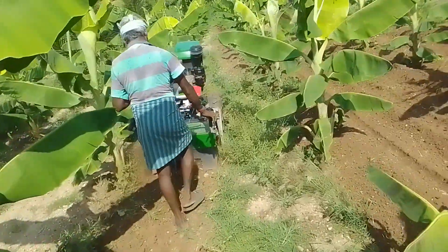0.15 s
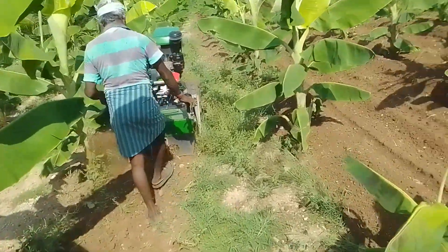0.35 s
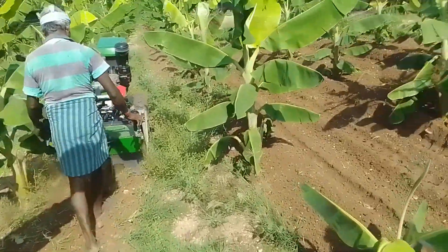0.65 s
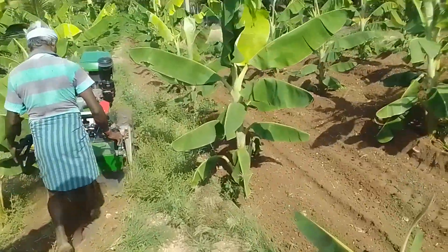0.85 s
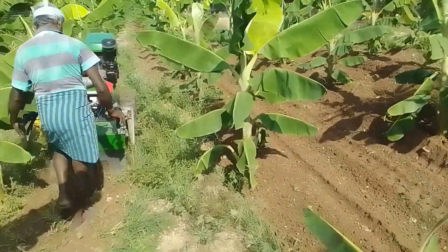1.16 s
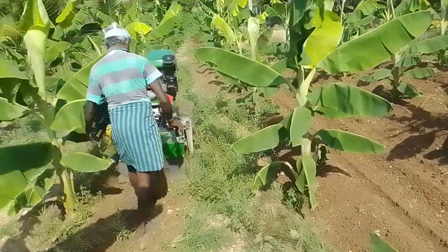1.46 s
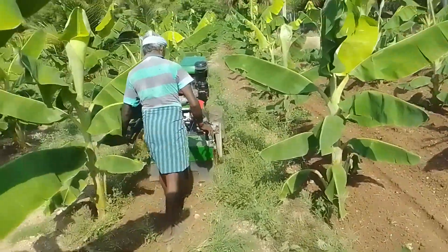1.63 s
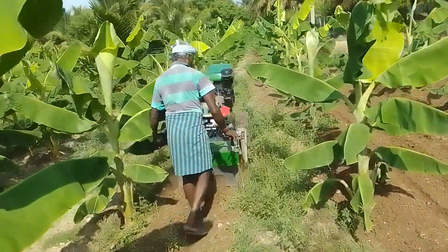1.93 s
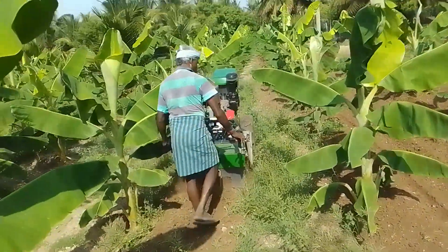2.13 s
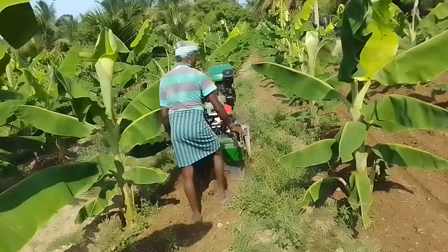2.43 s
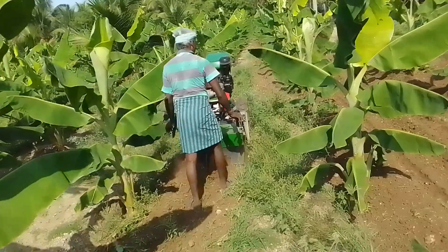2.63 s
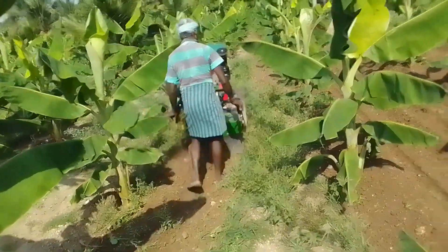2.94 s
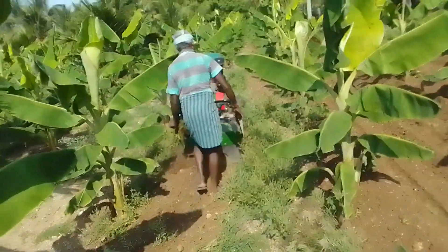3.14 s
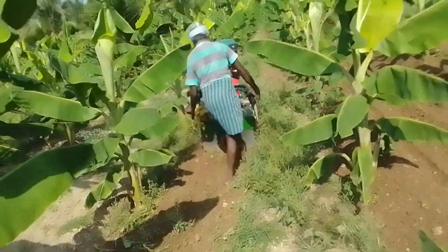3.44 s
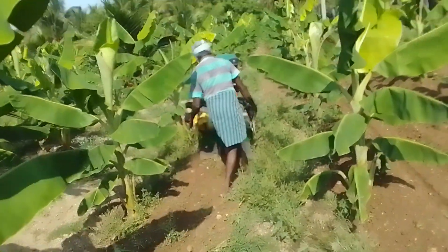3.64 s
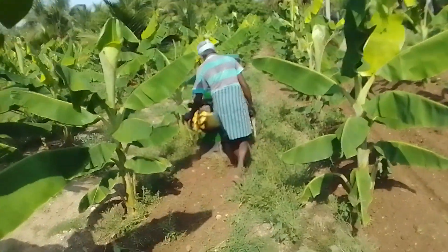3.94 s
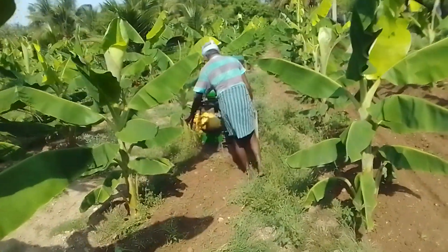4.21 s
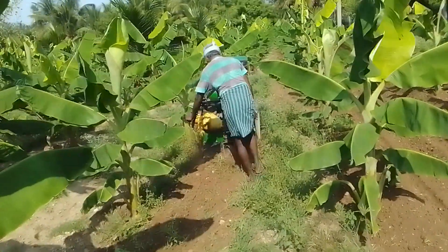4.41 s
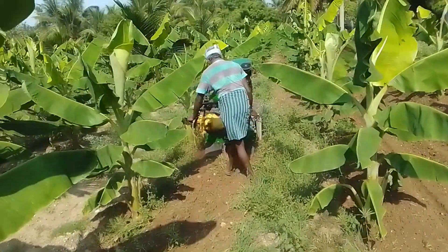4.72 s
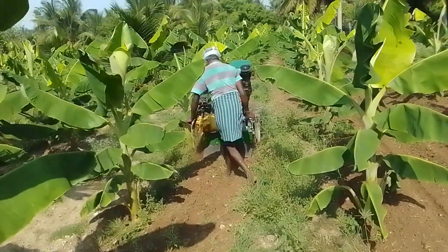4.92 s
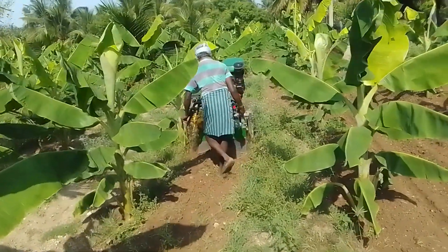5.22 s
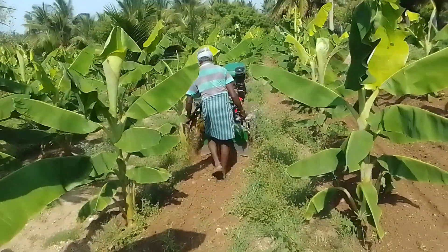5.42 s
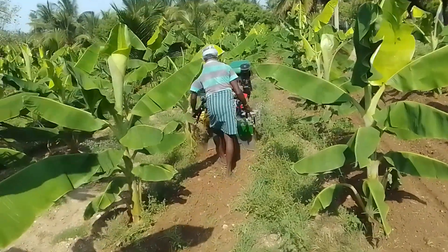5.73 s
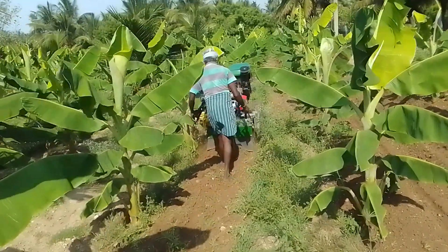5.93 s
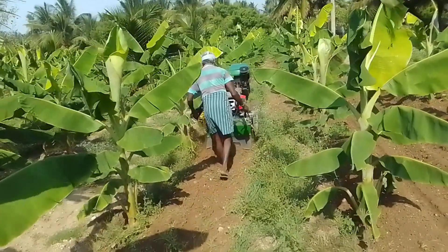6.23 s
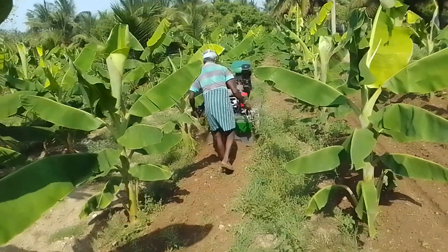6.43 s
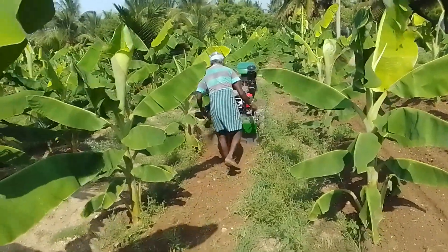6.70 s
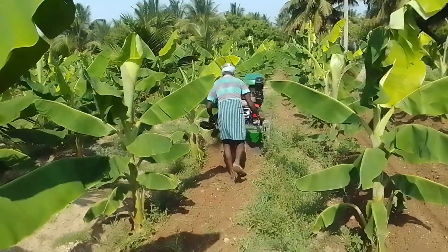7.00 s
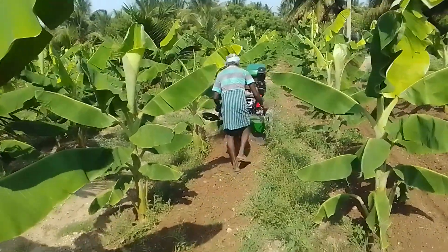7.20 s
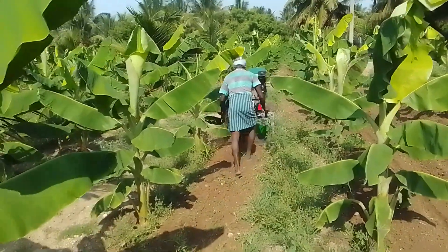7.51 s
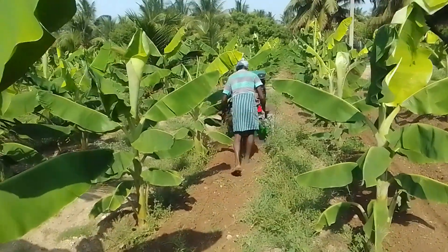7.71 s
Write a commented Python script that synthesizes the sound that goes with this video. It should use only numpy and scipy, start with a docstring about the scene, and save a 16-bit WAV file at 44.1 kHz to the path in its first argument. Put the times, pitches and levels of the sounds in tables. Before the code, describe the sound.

A single-cylinder diesel tiller works soil outdoors, about four metres from the microphone at first. From 0 to 2.5 s it chugs evenly at nearly sixteen firings a second: hard midrange knocks with ringing block tone, low exhaust thumps, dense metallic clatter and a fine pulsing sizzle. A thin wavering squeal near 1900 Hz swells around 1.5 s and flicks again at 1.9 s, with a bright stone tick at 1.8 s. Between 2.5 and 3.4 s the machine is screened; the hiss closes down and the chug turns dull, hollow and boxy, knocking steadily until 5.8 s. Then the throttle opens: strong hollow exhaust barks take over, knock softens until 7 s, and speed climbs to almost nineteen beats a second. Knock hardens again around 7.3 s. The machine gradually recedes, still running at the end, over barely audible open air.

```python
"""A single-cylinder diesel power tiller works a furrow and moves off between banana plants.
Each cycle, combustion knock rings block modes, the exhaust thumps and noise impacts clatter and sizzle.
Around 3 s man and leaves screen the machine and it turns dull; near 6 s the throttle opens further, the
engine speeds up and the tailpipe barks; the knock sinks until 7 s, then hardens again.
A pulley squeals (wavering sine), stones tick on the tines (noise bursts), faint open air lies behind."""
import sys
import numpy as np
from scipy import signal
from scipy.fft import rfft, irfft, next_fast_len
from scipy.io import wavfile
from scipy.ndimage import uniform_filter1d, map_coordinates

SR = 44100
rng = np.random.default_rng(int(sys.argv[2]) if len(sys.argv) > 2 else 0)


def dump_mix(stems):
    """Bounce the given channels to the path in sys.argv[1] as a 16-bit WAV at rate SR."""
    frames = np.atleast_2d(stems).T  # one column per channel
    limited = np.clip(frames, -1, 1)  # hard clip at full scale
    pcm = np.round(limited * 32767).astype(np.int16)
    wavfile.write(sys.argv[1], SR, pcm)


N = 346626
TIME_S = np.arange(N) / SR

# engine speed: (time [s], firings [1/s])
SPEED = [(0, 15.753), (.5, 15.749), (1, 15.973), (1.8, 16.002), (2.7, 15.981), (3.1, 15.724), (3.5, 15.764),
         (4, 15.886), (4.6, 15.98), (5.3, 15.938), (5.9, 15.888), (6.2, 16.472), (6.6, 17.16), (7, 17.877),
         (7.4, 18.415), (7.86, 18.76)]
# throttle, two pushes: (time [s], opening [0-1])
THROTTLE = [(5.8, 0.29), (5.97, 0.61), (6.3, 0.87), (6.72, 1), (6.9, 0.75), (7.25, 1), (7.62, 0.98),
            (7.86, 1)]
# combustion hardness, drives crack and block ring: (time [s], level [dB])
HARDNESS = [(0, -1.5), (1.6, 1), (2.75, 0), (2.95, -8), (3.25, -4), (3.5, -2.5), (4, 1), (4.6, 2.5),
            (5.2, 0), (5.9, -1), (6.35, -6), (7, -9), (7.35, 8), (7.86, 3)]
# the man steps in front of the engine, then leaves close behind him: (time [s], screening [0-1])
SCREEN = [(2.5, 0.21), (2.76, 0.42), (2.84, 0.66), (3.15, 0.76), (3.36, 1)]
# listener follows a few steps, then the tiller draws away: (time [s], distance [m])
DISTANCE = [(0, 4.17), (1.2, 4.12), (7.86, 8.44)]
# short combustion crack: (frequency [Hz], level [dB], decay [s], lag [s])
CRACK = [(815, 0, 0.0028, 0.0003), (690, -10, 0.0025, 0.0003)]
# lighter slaps of piston and valves: (position [cycles], level re crack [dB])
SLAPS = [(-.23, -10.5), (-.145, -11), (0.073, -12)]
# engine block modes: (frequency [Hz], level [dB], t60 [s])
BLOCK = [(625, -12.5, 0.053), (672, -8, 0.046), (749, -3.5, 0.31), (780, -10, 0.092), (865, -7.5, 0.2),
         (1025, -13, 0.11), (1104, -14.5, 0.12), (1250, -17.5, 0.056), (1357, -20.5, 0.16)]
# frame and guard modes: (frequency [Hz], level [dB], t60 [s])
FRAME = [(236, -24, 0.12), (287.8, -2, 0.18), (308, -24, 0.063), (366.4, -2.5, 0.15), (397.4, -2, 0.21),
         (434, -15.5, 0.13)]
# silencer boom at one exhaust pulse: (frequency [Hz], level [dB], decay [s], lag [s])
BARK = [(205, -5, 0.012, -0.0078), (255, 1.5, 0.0041, -.0012), (390, -21, 0.005, -.0005),
        (578, -4, 0.0051, 0)]
# tailpipe ring, level before colouring: (time [s], pitch [Hz], peak at nearest point [dB])
PIPE = [(0, 790, -20), (2.1, 820, -27), (2.9, 750, -26), (3.8, 691.5, -18), (4.6, 689.4, -20.5),
        (5.5, 720, -16), (5.86, 779, -22), (5.94, 805, -9), (6.17, 796, -11), (6.27, 593, -12.5),
        (6.65, 617, -9.5), (6.95, 740, -11), (7.15, 736, -9.5), (7.35, 732, -11.5), (7.6, 690, -7),
        (7.86, 693, -10.5)]
# clatter spectra, open and screened: (frequency [Hz], density [dB/Hz])
CLATTER_OPEN = [(60, -58), (160, -35), (240, -8.5), (400, 3), (560, -23.5), (780, -1.5), (1100, 1),
                (1350, -4.5), (1900, 6), (2300, -1.5), (2800, 0.5), (3300, -5), (3900, -8.5), (4600, -14.5),
                (6000, -68)]
CLATTER_SCREENED = [(60, -36), (160, -17), (240, 6.5), (400, 7.5), (510, 2.5), (620, 12), (850, 9.5),
                    (1020, 2.5), (1400, 1.5), (1900, -7), (2400, -2.5), (2900, -3.5), (3500, -16.5),
                    (3950, -43), (5000, -69)]
# clatter brightens as the engine swings into view, hollows out behind the man:
# (time [s], half length [s], centre [Hz], half width [octaves], level [dB])
VIEWS = [(1.15, 0.42, 2480, 0.24, 3.5), (2.0, 0.37, 3870, 0.25, 3.5), (3.08, 0.25, 1053, 0.43, -4)]
# thin singing covers: (frequency [Hz], width [Hz], level [dB])
COVERS = [(1112, 14, -12.5), (1434, 31, -11), (1704, 24, -13), (1912, 7.7, -14.5), (2061, 53, -16.5),
          (2283, 17, -10.5), (2430, 16, -16), (2838, 13, -12), (3670, 17, -21.5)]
# sizzle and grit spectra: (frequency [Hz], density [dB/Hz])
SIZZLE_SPECTRUM = [(3000, -36.5), (4100, -1.5), (5200, 3), (6500, -1.5), (7600, -9), (8400, -9.5),
                   (8900, -19.5), (9500, -13), (10300, -18.5), (10800, -22.5), (12500, -32), (15800, -32)]
GRIT_SPECTRUM = [(3000, -5.5), (4100, -0.5), (5500, 1.5), (7200, 1), (8700, -6.5), (10500, -2), (11800, -8),
                 (13000, -15), (15800, -19)]
# sizzle upper limit, falls as the machine is screened: (time [s], cutoff [Hz])
SIZZLE_CUT = [(2.4, 16500), (2.72, 8300), (3.2, 6770), (3.36, 3200)]
# pulley squeals: (time [s], half length [s], level [dB])
SQUEALS = [(1.55, 0.26, -27), (1.938, 0.035, -28.5), (3.336, 0.051, -42.5), (4.45, 0.16, -50),
           (4.873, 0.09, -42), (5.588, 0.14, -48.5)]
# stone ticks: (time [s], level [dB])
STONES = [(1.828, -33.5), (2.88, -51), (4.747, -68), (6.172, -71)]
# open air spectrum: (frequency [Hz], density [dB/Hz])
AIR = [(20, -6), (55, -3), (120, 0.5), (400, -10), (3000, -37)]
# part levels: (at nearest point [dB], added when screened [dB], added at full throttle [dB])
CRACK_DB = (-32.5, 5, -9.5)
BLOCK_DB = (-30.5, -0.8, -5)
FRAME_DB = (-30, -2, -10.5)
THUMP_DB = (-50.5, 1.5, 7)
BARK_DB = (-44.5, 2.5, 17)
CLATTER_DB = (-21.5, -9, 5.5)
COVERS_DB = (-25.5, -17.5, 3)
SIZZLE_DB = (-36, -13, 3)
GRIT_DB = (-61, -3.5, 3.5)

# position of each blow in the firing cycle
START_CYCLES = -.2576
FIRING_CYCLES, STROKE_CYCLES, BARK_CYCLES, THUMP_CYCLES = -.324, -.19, -.066, -.03
THUMP_DB_PER_HARDNESS_DB = 0.084
TICK_DB, TICK_THROTTLE_DB = -17, 11  # re fizz: throttle shut, added at full throttle
WAVER_DB, WAVER_PER_S = 0.6, 4  # the machine rocks over the soil
SQUEAL_HZ, SQUEAL_WANDER_HZ = 1927, 11
AIR_DB = -72
EDGE_HZ = 15750


def knock(cycles, screen, throttle):
    """Combustion cracks, slaps follow, the block rings on; the power stroke shakes the frame."""
    firing = blows(cycles, FIRING_CYCLES, vary_db=1.2, jitter_s=.00006)
    crack = puff(firing, CRACK, swell_cycles=1.4)
    for position, db in SLAPS:
        slap = blows(cycles, position, vary_db=1.5, jitter_s=0.00024)
        crack = crack + gain_of(db) * puff(slap, CRACK, swell_cycles=1.06)
    crack = colour(crack, [(300, -13), (550, -2), (1000, -1), (1500, 0), (3000, -7), (4000, -29.5)])

    # loose parts stir the same modes
    loose = rattle(cycles, repeat=0.12, rise_cycles=0.09, decay_cycles=0.45, rest_db=-8, vary_db=0.3)
    # with opening throttle the exhaust pulse takes over from the knock in ringing the block
    pulses = blows(cycles, BARK_CYCLES, vary_db=3.5, jitter_s=.0001)
    block_drive = (1 - throttle) * evened(firing) + throttle ** 2 * evened(pulses) + 0.51 * loose
    block = ring(block_drive, BLOCK, rise_s=0.01)

    stroke = blows(cycles, STROKE_CYCLES, vary_db=1.5, jitter_s=.0001)
    frame = ring(evened(stroke) + 0.5 * loose, FRAME, rise_s=0.0031)
    frame = colour(frame, [(170, -21), (235, -1.5), (430, -0.5), (520, -24.5)])

    combustion = part_gain(CRACK_DB, screen, throttle) * crack
    combustion = combustion + part_gain(BLOCK_DB, screen, throttle) * block
    hardness_db = curves(HARDNESS)[0]
    return gain_of(hardness_db) * combustion + part_gain(FRAME_DB, screen, throttle) * frame


def exhaust(cycles, screen, throttle):
    """Gas pulses thump low in the silencer; silencer and tailpipe bark as the throttle opens."""
    thump_clicks = blows(cycles, THUMP_CYCLES, vary_db=1.8, jitter_s=.00005)
    thump = puff(thump_clicks, [(120.3, 0, 0.008, 0.0016)], swell_cycles=0.83)
    thump = colour(thump, [(45, -17.5), (80, -4.0), (130, -0.5), (165, -23.5), (300, -22.5)])
    thump = gain_of(THUMP_DB_PER_HARDNESS_DB * curves(HARDNESS)[0]) * evened(thump)

    pulses = blows(cycles, BARK_CYCLES, vary_db=1.1, jitter_s=.00007)
    bark = puff(pulses, BARK, swell_cycles=0.99)
    bark = colour(bark, [(100, -21.0), (165, -16.5), (205, -7), (1000, -8.5), (3000, -13), (4000, -37.0)])

    pipe = tailpipe(pulses, swell_cycles=1.15, decay_s=.0029)
    pipe = colour(pipe, [(1500, -3), (3000, -4), (4000, -28)])
    silencer = part_gain(THUMP_DB, screen, throttle) * thump + part_gain(BARK_DB, screen, throttle) * bark
    return silencer + pipe


def tailpipe(clicks, swell_cycles, decay_s):
    """Each exhaust pulse rings the tailpipe for a few cycles; pitch and strength shift with the load."""
    hz, db = curves(PIPE)
    t = np.arange(-512, 1536) / SR
    out = np.zeros(N + len(t))
    for i in np.flatnonzero(clicks):
        fade = np.where(t < 0, (t * hz[i] / swell_cycles) ** 2, t / decay_s)
        tone = np.exp(-fade) * np.cos(2 * np.pi * hz[i] * t)
        out[i:i + len(t)] -= clicks[i] * gain_of(db[i]) * tone
    return out[t.searchsorted(0):][:N]


def clatter(cycles, screen, throttle):
    """Impacts of valve gear, chain and tines; thin covers take turns to pick out a few pitches."""
    drive = rattle(cycles, repeat=0.16, rise_cycles=0.08, decay_cycles=0.64, rest_db=-0.8, vary_db=0.8)
    drive = evened(tinny(drive, decay_s=.004, wet=.3))

    t = np.arange(SR // 6) / SR
    sing = 0
    for hz, width_hz, db in COVERS:
        mode = np.exp(-np.pi * width_hz * t) * np.cos(2 * np.pi * hz * t)
        tone = evened(signal.oaconvolve(drive, mode)[:N])
        sing = sing + gain_of(db + 1.5 * drift(3.5)) * tone
    sing = colour(sing, [(500, -33.5), (1000, 2.0), (3700, -2.0), (4200, -24)])

    in_open = evened(colour(drive, CLATTER_OPEN))
    screened = evened(colour(drive, CLATTER_SCREENED))
    gear = (1 - screen) * in_open + screen * screened
    for s, half_s, hz, octaves, db in VIEWS:
        band = [(hz * 2 ** (k * octaves), -3 * k ** 4) for k in np.linspace(-2, 2, 9)]
        view_gain = gain_of(db * np.exp(-((TIME_S - s) / half_s) ** 2))
        gear = gear + (view_gain - 1) * colour(gear, band)
    return part_gain(CLATTER_DB, screen, throttle) * gear + part_gain(COVERS_DB, screen, throttle) * sing


def sizzle(cycles, screen, throttle):
    """Fine metallic hiss, pulsing with the engine; it dulls from the top as the machine is screened."""
    cut_hz = curves(SIZZLE_CUT)[0]
    drive = rattle(cycles, repeat=0.033, rise_cycles=0.26, decay_cycles=0.57, rest_db=-4.5, vary_db=1.5)
    drive = tinny(drive, decay_s=.005, wet=.5)
    hz, s, z = signal.stft(evened(colour(drive, SIZZLE_SPECTRUM)), SR, nperseg=256)
    z = z / (1 + (hz[:, None] / np.interp(s, TIME_S, cut_hz)) ** 12)
    # different bits of metal take turns to ring
    patches = uniform_filter1d(rng.standard_normal(z.shape), size=4, axis=0)
    patches = evened(uniform_filter1d(patches, size=25, axis=1))
    z = z * gain_of(1.76 * patches)
    return part_gain(SIZZLE_DB, screen, throttle) * signal.istft(z, SR, nperseg=256)[1][:N]


def grit(cycles, screen, throttle):
    """A faint fizz of flung grit, and a noise tick of gas with every exhaust pulse."""
    fizz = rattle(cycles, repeat=0.14, rise_cycles=.25, decay_cycles=0.6, rest_db=-2, vary_db=3.0)
    fizz = tinny(fizz, decay_s=.005, wet=.55)
    tick = np.exp(-((cycles + 0.076) % 1) / .04) * rng.standard_normal(N)
    drive = evened(fizz) + gain_of(TICK_DB + TICK_THROTTLE_DB * throttle) * evened(tick)
    return part_gain(GRIT_DB, screen, throttle) * evened(colour(drive, GRIT_SPECTRUM))


def squeal():
    """A pulley's thin, broken, wavering tone that swells and fades."""
    swell = sum(gain_of(db) * np.exp(-((TIME_S - s) / half_s) ** 2) for s, half_s, db in SQUEALS)
    broken = gain_of(3.2 * drift(45))
    phase = 2 * np.pi * np.cumsum(SQUEAL_HZ + SQUEAL_WANDER_HZ * drift(70)) / SR
    return swell * evened(broken * np.sin(phase))


def stones():
    """Stones on the tines: short bright noise scrapes with fast onset and slower decay."""
    bursts = 0
    for s, db in STONES:
        age_s = TIME_S - s
        fade = np.where(age_s < 0, -age_s / 0.0046, age_s / 0.015)
        bursts = bursts + gain_of(db) * np.exp(-fade)
    spectrum = [(300, -43), (4000, 2), (6500, 3), (8400, 1), (9200, -8), (10300, 4), (11300, -15), (15000, -22)]
    return bursts * evened(colour(rng.standard_normal(N), spectrum))


def open_air():
    """Steady, mostly low noise of the open air."""
    return gain_of(AIR_DB) * evened(colour(rng.standard_normal(N), AIR))


def blows(cycles, at, vary_db, jitter_s):
    """One click each cycle at a given position, uneven in size and timing."""
    index = np.flatnonzero(np.diff(np.floor(cycles - at)) > 0)
    size, late = rng.standard_normal((256, 2))[:len(index)].T
    place = np.clip(index + np.round(late * jitter_s * SR).astype(int), 0, N - 1)
    clicks = np.zeros(N)
    np.add.at(clicks, place, gain_of(vary_db * size))
    return clicks


def ring(drive, modes, rise_s):
    """Exponentially dying modes with a soft start."""
    t = np.arange(SR // 3) / SR
    tone = sum(gain_of(db - 60 * t / t60) * np.sin(2 * np.pi * hz * t) for hz, db, t60 in modes)
    return evened(signal.oaconvolve(drive, tone * (1 - np.exp(-(t / rise_s) ** 2)))[:N])


def puff(clicks, modes, swell_cycles):
    """Broad resonances swell up at each click and die after it."""
    shape = 0
    for hz, db, decay_s, lag_s in modes:
        t = np.arange(-2048, 2049) / SR - lag_s
        fade = np.where(t < 0, (t * hz / swell_cycles) ** 2, t / decay_s)
        shape = shape - gain_of(db) * np.exp(-fade) * np.cos(2 * np.pi * hz * t)
    return evened(signal.oaconvolve(clicks, shape, "same"))


def rattle(cycles, repeat, rise_cycles, decay_cycles, rest_db, vary_db):
    """Dense small impacts, partly the same every cycle, that flare with the knock and ebb."""
    same = 0
    for k in range(3):  # the pattern changes slowly as the machine turns and tilts
        pattern = irfft(np.exp(2j * np.pi * rng.random(320)), 8192)
        repeated = np.interp(cycles % 1, np.arange(8192) / 8192, pattern)
        same = same + repeated * np.cos(TIME_S * 0.74 + k * np.pi / 3)
    share = np.clip(repeat, 0, 1)
    impacts = np.sqrt(share) * evened(same) + np.sqrt(1 - share) * rng.standard_normal(N)
    age = (cycles + 0.37) % 1
    flare = (1 - np.exp(-age / rise_cycles)) * np.exp(-(age / decay_cycles) ** 2)
    envelope = gain_of(rest_db) + flare * gain_of(vary_db * drift(20))
    return evened(impacts * envelope * gain_of(1.0 * drift(125)))


def tinny(x, decay_s, wet):
    """Countless tiny modes of sheet metal give the hiss a fixed fine colour."""
    t = np.arange(SR // 20) / SR
    sheet = rng.standard_normal(len(t)) * np.exp(-t / decay_s)
    return evened(x) + wet * evened(signal.oaconvolve(x, sheet)[:N])


def part_gain(part_db, screen, throttle):
    """Gain of one part: screening and throttle each shift it, and it wavers."""
    open_db, screened_db, throttle_db = part_db
    waver_db = WAVER_DB * drift(WAVER_PER_S)
    return gain_of(open_db + screened_db * screen + throttle_db * throttle + waver_db)


def colour(x, points):
    """Filters x by a spectrum of (frequency [Hz], level [dB]) points."""
    hz, db = np.transpose(points)
    size = next_fast_len(N + 4096)
    f = np.fft.rfftfreq(size, 1 / SR)
    gain = gain_of(np.interp(np.log(f + 1), np.log(hz), db))
    return irfft(rfft(x, size) * gain, size)[:N]


def drift(per_s):
    """Smooth random curve of rms 1, with per_s random knots a second."""
    knots = rng.standard_normal(1024)
    return evened(map_coordinates(knots, [TIME_S * per_s + 2], order=2, mode="wrap"))


def curves(rows):
    """Each column of a timed table, sample by sample."""
    s, *columns = np.transpose(rows)
    return [np.interp(TIME_S, s, c) for c in columns]


def evened(x):
    """Scales to rms 1."""
    return x / np.sqrt(np.mean(x ** 2) + 1e-20)


def gain_of(db):
    """Decibels to a factor."""
    return 10 ** (np.asarray(db) / 20)


def scene():
    """All engine parts follow one crank and one throttle, and fade together with distance."""
    cycles = START_CYCLES + np.cumsum(curves(SPEED)[0]) / SR
    throttle = np.clip(curves(THROTTLE)[0], 0, 1)
    screen = np.clip(curves(SCREEN)[0], 0, 1)
    distance_m = curves(DISTANCE)[0]
    parts = (knock, exhaust, clatter, sizzle, grit)
    tiller = sum(part(cycles, screen, throttle) for part in parts)
    return (tiller * distance_m.min() / distance_m + squeal() + stones() + open_air())[None]


def record(dry):
    """Low-pass band limit at EDGE_HZ."""
    lowpass = signal.firwin(1023, EDGE_HZ, window=("kaiser", 9), fs=SR)
    return signal.oaconvolve(dry, lowpass[None], "same")


dry = scene()
out = record(dry)
dump_mix(out)
```